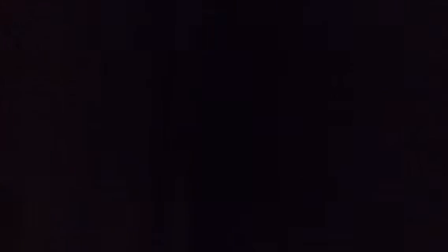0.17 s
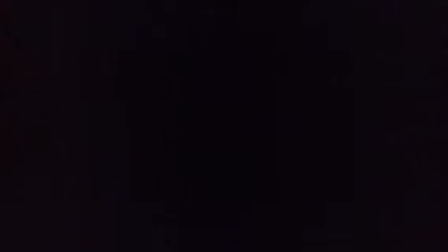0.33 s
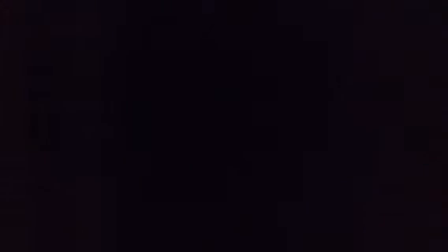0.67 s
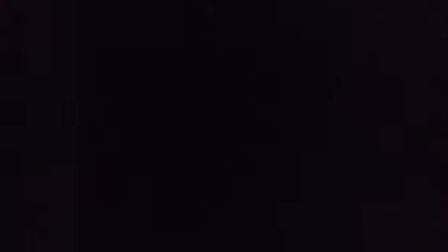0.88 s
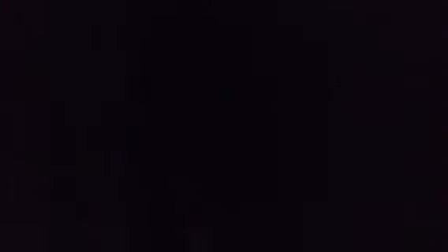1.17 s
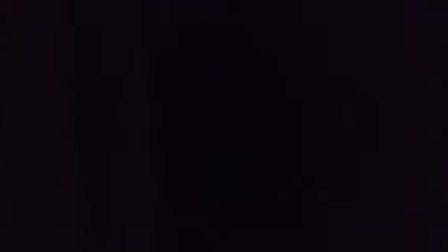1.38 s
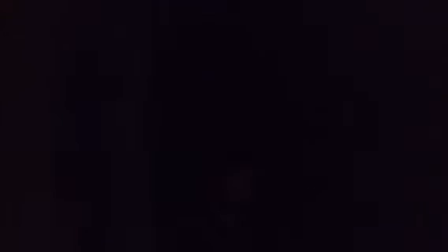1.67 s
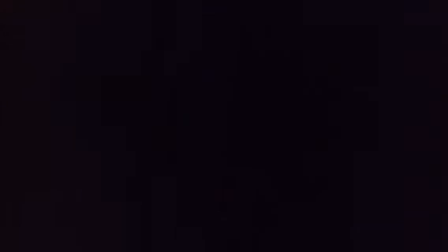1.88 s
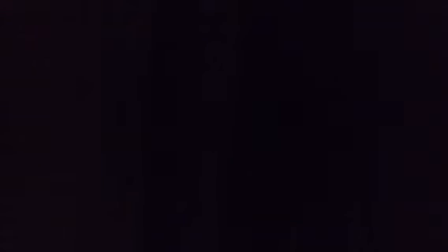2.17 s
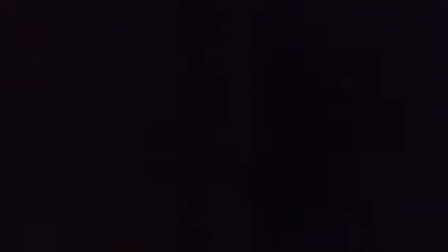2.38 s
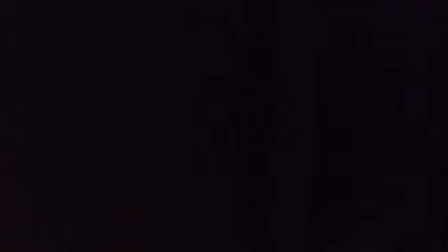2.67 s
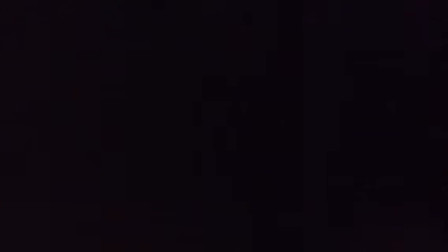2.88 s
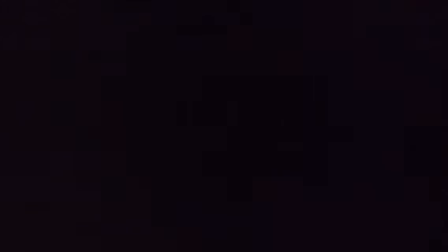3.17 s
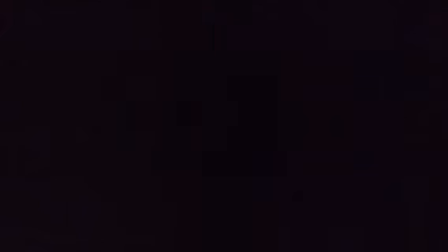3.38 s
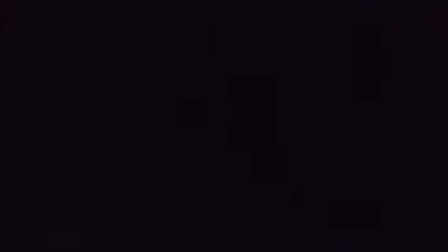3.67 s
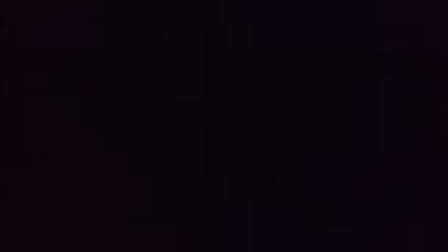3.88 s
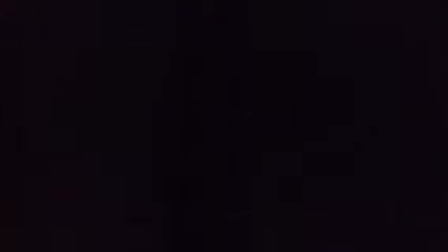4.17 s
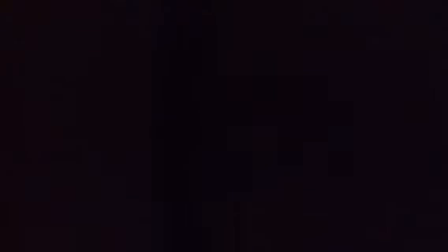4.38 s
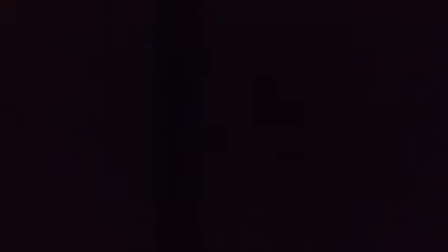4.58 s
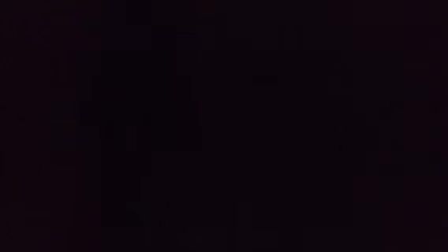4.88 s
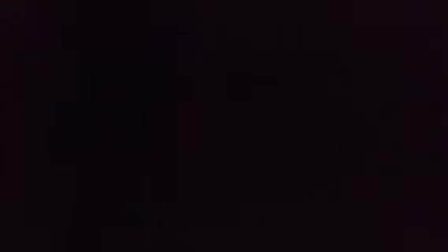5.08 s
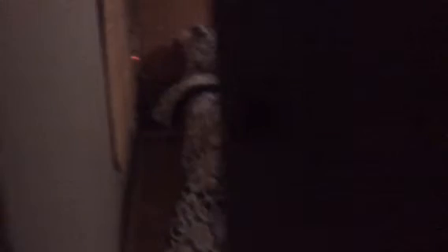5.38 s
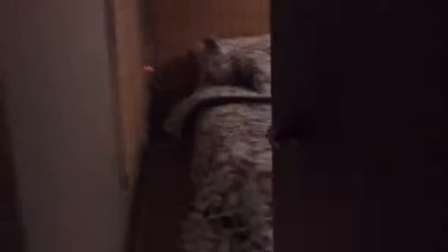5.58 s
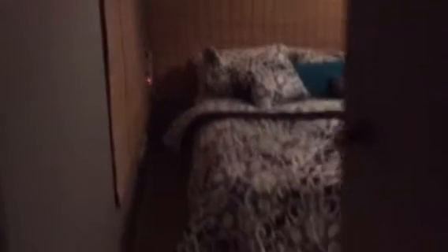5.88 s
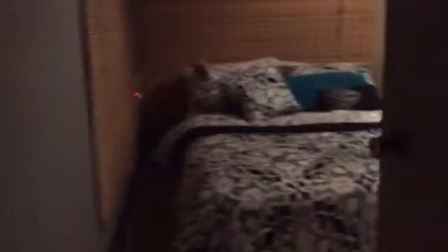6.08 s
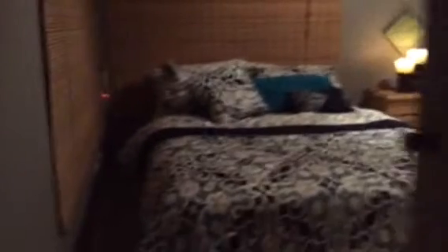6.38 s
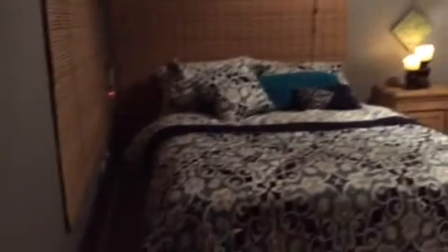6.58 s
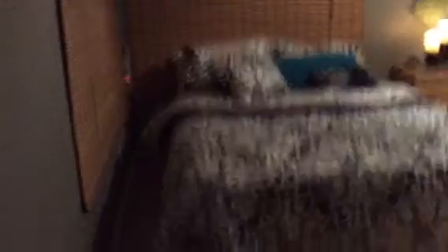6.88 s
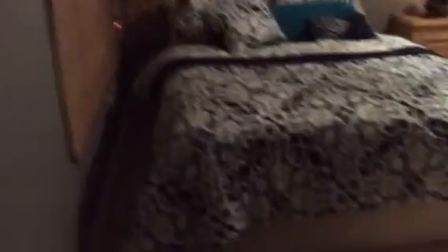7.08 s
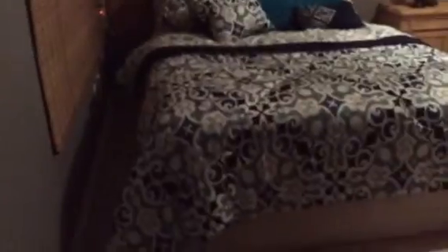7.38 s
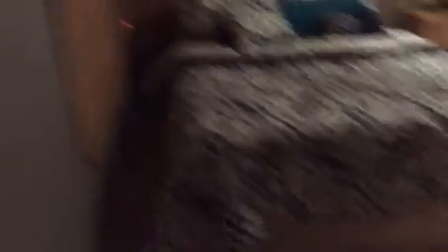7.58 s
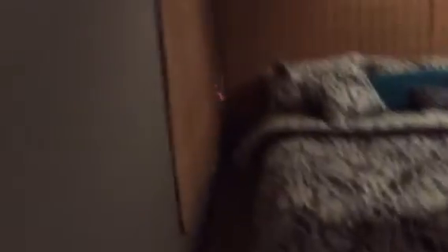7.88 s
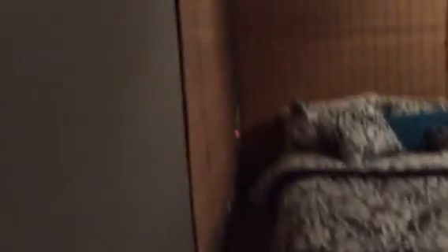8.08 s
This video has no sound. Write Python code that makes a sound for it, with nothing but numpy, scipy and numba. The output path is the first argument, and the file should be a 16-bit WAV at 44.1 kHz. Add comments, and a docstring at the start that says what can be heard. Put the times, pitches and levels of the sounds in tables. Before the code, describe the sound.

Throughout about 8 seconds, crickets trill near 7 kHz, swelling gently almost four times a second, with a fainter lower chorus, high rasp, soft hiss and weak wavering motor hum. The first two seconds hold only faint rustles and low handling thumps. At 2.4 to 2.7 s small knob clicks sound; from 3.0 to 3.3 s more metallic ticks and dull knocks. At 3.46 s the latch snaps in a tight cluster of sharp, ringing clicks, the loudest event. From 3.65 to 4.55 s the hinge squeals, falling fast from a thin whistle through a nasal squeak to a slow, gritty creak. Around 5.0 to 5.7 s come soft wooden thumps and faint rubs; at 6.2 s a dry tap on the microphone; near 7.05 and 7.5 s small bumps. The high rasp fades indoors. Close hand-held phone, short hallway tail, identical in both channels.

```python
"""Crickets trill outside over a motor hum and hiss: night in a thin-walled house, one hand-held phone microphone.
A hand works the knob and the latch snaps back, each click ringing the metal. The hinge, a train of stick-slip
pulses ringing plates and door leaf, squeals down from a whistle to a creak as the door slows. Steps and the hand
on the phone add low thumps, rustles and dry taps. Insects are gated noise, the hum is wavering sines."""
import sys
import numpy as np
from scipy import signal
from scipy.fft import rfft, irfft, next_fast_len
from scipy.io import wavfile
from scipy.ndimage import uniform_filter1d
from numba import njit

SR = 44100
rng = np.random.default_rng(int(sys.argv[2]) if len(sys.argv) > 2 else 0)


def wav_record(signal):
    """Record a signal, one row per channel, as 16-bit PCM in the file named by sys.argv[1]."""
    frames = np.transpose(np.atleast_2d(signal))
    bounded = np.clip(frames, -1, 1)
    # unit amplitude maps onto the largest positive 16-bit level
    quanta = np.round(bounded * 32767).astype(np.int16)
    wavfile.write(sys.argv[1], SR, quanta)


N = 363472


def undb(db):
    """dB to gain."""
    return 10 ** (np.asarray(db, float) / 20)


def unit(x):
    """Scale to rms 1."""
    return x / np.sqrt(np.mean(x ** 2))


def unit_energy(x):
    """Scale an impulse response so that its squares sum to 1."""
    return x / np.sqrt(np.sum(x ** 2))


def curves(table):
    """Columns of a table, after the time in seconds, as one value per sample."""
    s, *columns = np.transpose(table)
    return [np.interp(np.arange(N) / SR, s, c) for c in columns]


def band(x, hz, width_hz):
    """Resonance with gain 1 at its centre."""
    return signal.lfilter(*signal.iirpeak(hz, hz / width_hz, SR), x)


# the tilt brightens a ring fully up to the knee, and only by this share beyond
BRIGHT_KNEE_HZ, ABOVE_KNEE = 4400, 0.12


def ring(modes, tilt_db=0., pivot_hz=2000, size=6000, opposed=True):
    """Decaying modes struck at once, tilted in dB per octave around a pivot; peak 1.

    Neighbours swing in opposite sense, or in the same, which leaves notches between them."""
    hz, db, t60 = np.transpose(modes)[:, :, None]
    t = np.arange(size) / SR
    sense = (-1) ** (opposed * np.arange(len(modes))[:, None])
    octaves_past_knee = np.maximum(np.log2(hz / BRIGHT_KNEE_HZ), 0)
    octaves = np.log2(hz / pivot_hz) - (1 - ABOVE_KNEE) * octaves_past_knee
    fade = undb(db + tilt_db * octaves - 60 * t / np.maximum(t60, 1e-3))
    h = np.sum(sense * fade * np.sin(2 * np.pi * hz * t), axis=0)
    return h / np.abs(h).max()


def walk(rate):
    """Random levels held 1 / rate s and smoothed twice over as long; cut to N samples, then scaled to rms 1."""
    k = int(SR / rate)
    steps = np.repeat(rng.standard_normal(N // k + 1), k)
    return unit(uniform_filter1d(uniform_filter1d(steps, k), k)[:N])


def add(track, s, sound):
    """Mix a sound into a track at time s."""
    i = int(s * SR)
    track[i:i + len(sound)] += sound[:len(track) - i]


def stretch(s, length_s, edge_s):
    """1 from s for length_s, 0 elsewhere, with soft edges inside the stretch."""
    t = np.arange(N) / SR
    return np.clip(np.minimum(t - s, s + length_s - t) / edge_s, 0, 1)


# stepping through the doorway: middle moment and length
ENTER_S, ENTER_LENGTH_S = 6.25, 0.99


def inside():
    """0 in the hallway, 1 in the bedroom."""
    return np.clip((np.arange(N) / SR - ENTER_S) / ENTER_LENGTH_S + .5, 0, 1)


@njit
def slips(hz, rough, jitter, spread, chance):
    """A pulse at each wrap of the phase, shared between two samples; length and size vary from slip to slip."""
    out, p, k = np.zeros(len(hz) + 1), 0., 0
    for i in range(len(hz)):
        step = hz[i] * (1 + jitter * rough[i] * chance[k, 0]) / SR
        p += step
        if p >= 1:
            p, k = p - 1, k + 1
            size = np.exp(spread * rough[i] * chance[k, 1])
            out[i] += size * p / step
            out[i + 1] += size * (1 - p / step)
    return out[:-1]


# The squealing hinge. Each row: time in seconds, slips per second in Hz, drive level in dB before the mix,
# shove on the door leaf against the slips in dB.
HINGE = [(3.648, 1662, -55, -5), (3.68, 1525, -41.5, -2), (3.694, 1399, -42, -3), (3.697, 1368, -33, -22),
         (3.708, 1318, -34, -24), (3.73, 1273, -33.5, -20), (3.752, 1188, -30.5, -20),
         (3.76, 1007, -31, -18), (3.77, 1032, -31, -28), (3.794, 1006, -32, -12), (3.803, 984, -25.5, -14),
         (3.818, 919, -30, -9), (3.836, 906, -31, -4), (3.846, 870, -29.5, -5), (3.858, 857, -31.5, -6),
         (3.88, 832.6, -32, -4), (3.89, 794.6, -32, -8), (3.9, 775, -32, -8), (3.92, 753, -32, -5.5),
         (3.952, 697, -32.5, -5.5), (3.99, 633.7, -34, -2.5), (4.022, 572.5, -35, -2),
         (4.042, 550.6, -36, -4), (4.068, 507.4, -36, -2), (4.108, 452.6, -36.5, -11),
         (4.132, 423.8, -36, -5), (4.148, 408, -38.5, -10), (4.162, 383.7, -40, 0.5),
         (4.184, 355.7, -42, -13), (4.196, 342.7, -40, -1), (4.212, 333.8, -38.5, 0.5),
         (4.238, 315.6, -40, -16), (4.254, 297.2, -42, -2.5), (4.3, 239.7, -42.5, 1),
         (4.318, 229.2, -43, -16), (4.331, 219.7, -43, -2), (4.35, 205.4, -43, -10),
         (4.368, 193.6, -43.5, -4), (4.398, 168.3, -45, -16), (4.416, 156.5, -44.5, 2),
         (4.432, 145.7, -45.5, -11), (4.447, 135.3, -46, 0), (4.468, 124, -49, -17),
         (4.511, 118.9, -51.5, -1.5), (4.56, 100.4, -74, -5)]
# Hinge leaves and the door skin around them. Each row: mode in Hz, relative level in dB, t60 in seconds.
PLATE = [(906, -16, 0.032), (1204, 1, 0.016), (1720, -1, 0.044), (1853, -10.5, .03), (2028, 2, 0.032),
         (2305, -0.5, 0.028), (2567, -4, 0.024), (2845, -4.5, 0.021), (3230, -11, 0.022), (3440, -4, 0.024),
         (3686, -1, 0.026), (3926, -2.5, 0.029), (4070, -2.5, 0.026), (4230, -12.5, 0.028),
         (4615, -10, 0.034), (5140, -9.5, 0.027), (5440, -2, 0.016), (5970, -2.5, 0.0085),
         (7560, -15, 0.0041), (9600, -28, 0.0083)]
# The same plates held while the pin sticks long between slips, ringing short and broad.
# Each row: mode in Hz, relative level in dB, t60 in seconds.
HELD_PLATE = [(695, -15, 0.0084), (1090, -8, 0.016), (1410, -8, 0.02), (1714, 2, 0.019), (1894, -3, 0.024),
              (2540, 1, 0.0057), (3440, 2, 0.0041), (4140, 2.5, 0.0065), (5100, 5.5, 0.0038),
              (5860, 2.5, 0.0045), (8140, 4, 0.0013), (10800, -20, 0.0026)]
# Door leaf as the hinge drives it, with dead spots between its modes.
# Each row: mode in Hz, relative level in dB, t60 in seconds.
LEAF = [(120, -2, .09), (135, 3, 0.083), (157, 0, .09), (193, 3, .09), (222, 7.5, .09), (249, 10, .08),
        (275, 6, 0.062), (345, 6.5, .08), (388, 2, .09), (435, 3, 0.092), (506, 1.5, 0.079),
        (608, 4.5, 0.097), (644, -2, 0.079), (695, -3, 0.12), (745, -1.5, 0.098), (855, -3, 0.05),
        (860, 2.5, .07), (918, 2, .05), (990, 4, 0.066), (1090, -1, 0.068), (1205, -6, 0.065)]
# the pin catches at this moment; before it the slips are more uneven and their edge softer
CATCH_S, UNEVEN_BEFORE_CATCH, EDGE_BEFORE_CATCH_DB = 3.76, .2, -1.5
# slower slips are more uneven and grittier; values at 500 slips per second, change per octave slower
UNEVEN, UNEVEN_PER_OCTAVE = .21, .09
GRIT_DB, GRIT_DB_PER_OCTAVE = -9, 2.5
EDGE_DB = 2.15  # lift of the drive above 2800 Hz
SCRAPE_S = 0.0028  # decay constant of the grit that each slip drags along


def hinge():
    """Stick-slip on the pin: each slip drags grit, rings the plates and shoves the leaf."""
    hz, level_db, leaf_db = curves(HINGE)
    octaves_slower = np.log2(500 / hz)
    t = np.arange(N) / SR
    before_catch = t < CATCH_S
    rough = UNEVEN + UNEVEN_PER_OCTAVE * octaves_slower + UNEVEN_BEFORE_CATCH * before_catch
    moving = (t > HINGE[0][0]) & (t < HINGE[-1][0])
    # the slip rate flutters as the pin meets rough spots
    flutter = 1 + .0035 * walk(120)
    chance = rng.standard_normal((N // 20, 2))
    pulses = slips(hz * flutter * moving, np.clip(rough, 0, 1), 0.11, 0.14, chance)
    uneven_grip = undb(1.45 * walk(60))
    equal_power = np.sqrt(SR / hz)  # at any slip rate
    pulses = undb(level_db) * pulses * uneven_grip * equal_power
    keep = np.exp(-1 / (SCRAPE_S * SR))
    bursts = signal.lfilter([1 - keep], [1, -keep], pulses) * equal_power
    grit = undb(GRIT_DB + GRIT_DB_PER_OCTAVE * octaves_slower) * bursts * rng.standard_normal(N)
    # a harder release of the pin drives the upper modes more
    drive = pulses + grit
    soft = signal.sosfilt(signal.butter(2, 2800, fs=SR, output="sos"), drive)
    force = soft + undb(EDGE_DB + EDGE_BEFORE_CATCH_DB * before_catch) * (drive - soft)
    # share of the force's power that meets held plates
    sticking = np.clip(0.6 + 0.7 * octaves_slower, 0, .9)
    free = signal.fftconvolve(force * np.sqrt(1 - sticking), unit_energy(ring(PLATE)))[:N]
    held = signal.fftconvolve(force * np.sqrt(sticking), unit_energy(ring(HELD_PLATE)))[:N]
    snap = band(force, 2700, 3100)  # the slip itself, heard directly
    shove = undb(leaf_db + 1.9 * sticking * walk(40)) * pulses
    leaf = signal.fftconvolve(shove, unit_energy(ring(LEAF, opposed=False)))[:N]
    return undb(-2.0) * (free + held) + undb(-11.5) * snap + undb(1.5) * leaf


# Clicks of knob, latch and hand. Each row: start in seconds, peak in dB before the closing band-pass,
# brightness in dB per octave.
CLICKS = [(2.394, -26, 10), (2.4, -31, 12), (2.5923, -30, -10), (2.5982, -39, -7), (2.601, -41, -7),
          (2.719, -33, -12), (3.02, -40, -2), (3.03, -33, 2.5), (3.119, -25.5, 12.5), (3.124, -22.5, 8),
          (3.155, -26, 23), (3.205, -33, 15), (3.217, -24, 2), (3.227, -34, 2), (3.256, -36, -3),
          (3.293, -33, -2), (3.453, -23, 1), (3.4597, -20, 8), (3.4637, -6, -1.5), (3.4678, -5, -7.5),
          (3.4723, -13, 10), (3.4771, -7.5, -1.5), (3.4813, -14, 2), (3.491, -25, 6), (3.503, -29, 7),
          (3.521, -34, -3), (3.532, -36, -7), (5.037, -33.5, -2), (5.049, -39, -5), (5.141, -35, -7),
          (5.153, -42, -10), (5.171, -38, -7), (5.62, -39, 2)]
# Knob and latch. Each row: mode in Hz, relative level in dB before a random spread,
# t60 in seconds when no hand holds the knob.
METAL = [(1270, -22.5, .012), (1515, -8, 0.022), (1630, -3.5, 0.014), (1693, -1, 0.015),
         (1731, -1.5, 0.032), (1876, -9, 0.03), (2210, -14.5, 0.017), (2350, -19, 0.015),
         (2700, -17.5, 0.015), (3050, -14.5, 0.016), (3420, -18.5, .015), (3640, -13, .018),
         (4010, -6, 0.023), (4090, -8.5, 0.016), (4360, -10.5, 0.012), (4670, -17, 0.013),
         (4800, -16.5, 0.013), (5300, -14, 0.012), (5880, -14.5, 0.015), (6350, -19, 0.0074),
         (6800, -18, 0.0093), (7600, -40, .006), (9700, -27, .005)]
GRIP_DAMPING = .5  # share of the free ring time left while the hand holds the knob
RATTLE_S = 0.0054  # decay constant of the rattle


def clicks():
    """Each click is a tick and a short rattle of contacts; it rings the hardware and cracks broadly."""
    out, size = np.zeros(N), 1500
    damped = np.array(METAL) * [1, 1, GRIP_DAMPING]
    grits = rng.standard_normal((len(CLICKS), size + len(METAL)))
    for (s, peak_db, tilt_db), grit in zip(CLICKS, grits):
        blow = 0.12 * grit[:size] * np.exp(-np.arange(size) / SR / RATTLE_S)
        blow[0] = 1
        # every contact point excites the modes a little differently, here by 2.5 dB
        modes = damped + np.outer(2.5 * grit[size:], [0, 1, 0])
        sound = signal.fftconvolve(blow, ring(modes, tilt_db))
        crack = band(band(blow, 2000, 8100), 1600, 7900)
        add(sound, 0, undb(8.0 + 0.33 * tilt_db) * crack)
        add(out, s, undb(peak_db) * sound / np.abs(sound).max())
    return signal.sosfilt(signal.butter(2, [350, 9500], "band", fs=SR, output="sos"), out)


# Small dry ticks. Each row: start in seconds, peak in dB, centre in Hz, width in Hz.
TICKS = [(5.1295, -37, 1200, 1000), (5.13, -33, 5200, 3000), (5.1312, -37, 2600, 1500),
         (5.1375, -35, 2200, 3000), (6.1942, -35, 1700, 900), (6.367, -40, 3500, 4000),
         (6.6775, -32, 4400, 500), (6.678, -41, 1800, 900), (7.043, -39, 2300, 200),
         (7.053, -40, 2300, 200)]
TICK_S = .0008  # decay constant


def ticks():
    """A tiny burst, partly broad, mostly coloured by its own resonance."""
    out, t = np.zeros(N), np.arange(600) / SR
    for (s, peak_db, hz, width_hz), grit in zip(TICKS, rng.standard_normal((len(TICKS), 600))):
        burst = (1 + .5 * grit) * np.cos(2 * np.pi * hz * t) * np.exp(-t / TICK_S)
        broad = band(grit * np.abs(burst), 4000, 8300)
        sound = unit(band(burst, hz, width_hz)) + 0.33 * unit(broad)
        add(out, s, undb(peak_db) * sound / np.abs(sound).max())
    return out


# Low thumps of steps and hand. Each row: start in seconds, peak in dB, brightness in dB per octave.
THUMPS = [(0.881, -42, -7), (1.107, -33, -6.5), (2.157, -47, -7.5), (2.394, -42, 5), (2.595, -42.5, 2),
          (2.722, -48, -2.5), (3.056, -36, -10.5), (3.216, -29.5, 3), (3.242, -30, -10.5), (3.258, -31, -6),
          (3.317, -28, -10.5), (3.339, -41, -7), (3.464, -38, 4.5), (3.479, -39, 4.5), (3.49, -35, 5.5),
          (5.037, -28.5, -3.5), (5.056, -33.5, -2), (5.084, -31.5, -1), (5.278, -34.5, 1), (5.523, -40, -1),
          (5.707, -41, -9), (6.1888, -36, -2.5), (6.564, -44, 3), (7.043, -37.5, 5), (7.047, -33.5, 4.5),
          (7.084, -43, 4), (7.533, -35, -8)]
# Door leaf and floor. Each row: mode in Hz, relative level in dB, t60 in seconds.
WOOD = [(60.6, -5.5, 0.068), (123.5, 4, 0.053), (184, -4, 0.093), (237, 0.5, 0.069), (386, -1, 0.03),
        (570, -7, 0.093), (757, -0.5, 0.031), (1120, -19, .02)]
# push length at brightness 0, and the added brightness in dB per octave that halves it
PUSH_S, PUSH_HALVES_DB = 0.0024, 6.5


def thumps():
    """A soft push rings the wood; the shorter the push, the brighter."""
    out = np.zeros(N)
    for s, peak_db, tilt_db in THUMPS:
        push_s = PUSH_S * 2 ** (-tilt_db / PUSH_HALVES_DB)
        push = np.hanning(int(push_s * SR) + 4.0)
        sound = signal.fftconvolve(push, ring(WOOD, tilt_db, pivot_hz=240))
        add(out, s, undb(peak_db) * sound / np.abs(sound).max())
    return out


# Rustles, narrow rubs and a low buzz of cloth, fingers and wood.
# Each row: start in seconds, level in dB before the swell shapes it, length in seconds, centre in Hz, width in Hz.
RUSTLES = [(0., -52, 0.037, 704, 2000), (1.013, -47.5, 0.062, 11000, 12000), (1.056, -54, 0.11, 3450, 6000),
           (1.529, -48, 0.099, 700, 2490), (3.02, -50, 0.07, 1190, 3000), (3.141, -46.5, 0.026, 600, 1200),
           (3.2, -41, 0.08, 500, 1400), (4.697, -54, 0.13, 4000, 900), (4.93, -53.5, 0.098, 1810, 300),
           (5.035, -52, 0.035, 3600, 1500), (5.077, -56, .05, 3000, 302), (5.2, -56, 0.46, 4030, 700),
           (5.13, -49, 0.059, 1600, 900), (5.201, -60, 0.23, 1830, 150), (5.321, -55.5, 0.33, 1820, 130),
           (5.087, -43.5, 0.057, 138, 25), (7.042, -44.5, 0.031, 260, 50), (7.043, -59, 0.027, 800, 150),
           (7.071, -48, 0.064, 240, 60), (5.126, -57, 0.035, 2960, 6960), (7.034, -54, 0.024, 3000, 4470)]


def rustles():
    """Short grainy swells of noise, each through its own broad or narrow resonance."""
    out = np.zeros(N)
    grits = rng.standard_normal((len(RUSTLES), 2, SR // 2))
    for (s, level_db, length_s, hz, width_hz), grit in zip(RUSTLES, grits):
        n = int(length_s * SR)
        graininess_db = 0.62 * unit(uniform_filter1d(grit[1, :n], size=200))
        grains = grit[0, :n] * undb(graininess_db)
        add(out, s, undb(level_db) * np.hanning(n) ** .5 * unit(band(grains, hz, width_hz)))
    return out


# A finger on the phone body, right at the microphone. Each row: start in seconds, peak in dB, length in seconds.
TAPS = [(2.7205, -30, 0.0066), (5.678, -34, 0.0056), (5.7025, -33, 0.0033), (6.1895, -36, 0.0042),
        (6.1927, -20.5, 0.0029), (6.198, -35, 0.0038), (6.2078, -33, 0.0033)]


def taps():
    """A dry pull-and-push of air: one swing down and a larger swing up, without ring."""
    out = np.zeros(N)
    for s, peak_db, length_s in TAPS:
        u = np.arange(int(length_s * SR)) / (length_s * SR)
        swing = -np.sin(2 * np.pi * u ** 0.71) * np.sin(np.pi * u) * (0.69 + u)
        add(out, s, undb(peak_db) * swing / swing.max())
    return out


def singer(hz, width_hz, stroke_hz, depth, sharp):
    """One insect: wing strokes at a wavering rate gate a noisy resonance."""
    phase = np.cumsum(stroke_hz * (1 + 0.042 * walk(2.8))) / SR + rng.random()
    gate = 1 - depth + depth * np.abs(np.sin(np.pi * phase)) ** (2 * sharp)
    return unit(band(band(gate * rng.standard_normal(N), hz, width_hz), hz, width_hz))


# The night as heard where the phone is. Each row: time in seconds, near crickets in dB before their swells,
# far chorus in dB, top rasp in dB, hiss in dB before its waver (played by room).
NIGHT = [(0., -53.5, -57, -56, -61), (.8, -52.5, -59, -58.5, -63), (1.19, -56.5, -51.5, -58, -58),
         (1.3, -51, -53, -61, -55.5), (1.6, -47.5, -55, -64, -53.5), (2.3, -46.5, -57, -62, -53),
         (3.0, -47.5, -57.5, -62, -51.5), (3.35, -46.5, -54, -58, -45.5), (3.6, -47.5, -57.5, -64, -54),
         (4.6, -46.5, -56, -66, -50), (5.5, -47, -58.5, -73, -53), (6.3, -48.5, -64.5, -82, -54),
         (6.9, -48.5, -63, -71, -56.5), (7.3, -49, -60.5, -70.5, -56), (8.24, -51.5, -62.5, -69, -60)]
# near crickets swell in chorus; the depth is a share of the amplitude
CHIRP_HZ, FIRST_CHIRP_S, CHIRP_DEPTH = 3.875, 0.045, 0.26
# two groups drift in and out of step: the depth varies by this much, and is shallowest once per period
CHIRP_BEAT, BEAT_PERIOD_S, SHALLOW_S = 0.098, 2.14, 1.53
# rasp at 9 to 10 kHz: level in the hallway, change in the bedroom
RASP_DB, RASP_INSIDE_DB = -62.5, -8


def insects():
    """Near crickets overlap around 7 kHz; a far chorus sits near 3 kHz; bush crickets rasp at the top."""
    near_db, low_db, high_db, _ = curves(NIGHT)
    t = np.arange(N) / SR
    depth = CHIRP_DEPTH - CHIRP_BEAT * np.cos(2 * np.pi * (t - SHALLOW_S) / BEAT_PERIOD_S)
    chirps = 1 + depth * np.cos(2 * np.pi * CHIRP_HZ * (t - FIRST_CHIRP_S))
    near = singer(6927, 230, 46, 0.23, 0.4) + singer(7175, 276, 66, 0.21, 0.62)
    near = near + 0.29 * singer(6880, 470, 60, 1.0, 1.9)
    low = singer(3055, 344, 40, 0.19, 0.72) + 0.57 * singer(2651, 240, 36, 0.19, 0.87)
    mid = singer(9380, 920, 31, 0.12, 1.1) + 0.65 * singer(10100, 250, 61, 0.33, 1.2)
    # the top rasp changes singer when the door has opened
    opened = np.clip((t - 6.3) / 0.63, 0, 1)
    slow = singer(14300, 3500, 13.4, .45, 1.4) * undb(1.5 * walk(8))
    high = (1 - opened) * singer(14400, 3200, 30.7, 0.23, 0.66) + opened * slow
    near = unit(near) * chirps * undb(near_db + 1.46 * walk(12))
    mid = unit(mid) * undb(RASP_DB + RASP_INSIDE_DB * inside())
    return near + unit(low) * undb(low_db) + mid + high * undb(high_db)


# Colour of the room hiss. Each row: frequency in Hz, relative level in dB per Hz.
HISS = [(30, 4), (60, -2.5), (140, 2), (500, -9.5), (1300, -10), (1950, -4), (2400, -17), (3650, -9),
        (4100, -3), (4600, -8.5), (6100, -9), (7500, -5.5), (8200, -66), (15300, -54)]
# Hand rubbing the hardware. Each row: start in seconds, length in seconds, level at its middle in dB.
RUBS = [(1.017, 0.3, -59), (2.98, 1, -57.5), (4.45, 0.15, -65), (5.0, 0.26, -73)]
# Low rustle. Each row: time in seconds, level in dB.
RUSTLE = [(0., -53), (.25, -60.5), (1.6, -57), (1.9, -74.5), (2.9, -68), (3.2, -50), (3.45, -62),
          (4.5, -53), (4.8, -61.5), (5.15, -54.5), (5.8, -56), (8.24, -55)]
# steady rub: level in the hallway, change in the bedroom
RUB_DB, RUB_INSIDE_DB = -71, 8.5


def room():
    """Coloured hiss, noise rubbed into the hardware and a grainy low rustle."""
    hiss_db = curves(NIGHT)[-1]
    rubbing = undb(RUB_DB + RUB_INSIDE_DB * inside())
    for s, length_s, db in RUBS:
        rubbing = rubbing + undb(db) * stretch(s, length_s, length_s / 2)
    size = next_fast_len(N)
    hz = np.maximum(np.fft.rfftfreq(size, 1 / SR), 1)
    colour_hz, colour_db = np.transpose(HISS)
    colour = undb(np.interp(np.log(hz), np.log(colour_hz), colour_db))
    hiss = unit(irfft(colour * rfft(rng.standard_normal(size)), size)[:N]) * undb(hiss_db)
    hiss = hiss * undb(.7 * walk(9))
    rub = unit(signal.fftconvolve(rng.standard_normal(N) * undb(2.4 * walk(30)), ring(PLATE))[:N])
    rustle = unit(band(rng.standard_normal(N) * undb(1.7 * walk(40)), 245, 430))
    return hiss + rub * rubbing + rustle * undb(curves(RUSTLE)[0])


# Motor lines. Each row: frequency in Hz, wander in Hz, waver in dB.
HUM_LINES = [(59, 3.5, 2), (118, 4, 4), (173, .8, 1.2), (236, 1.5, 1.5), (883, 1.2, 1.5)]
# Level of each motor line, in the same order. Each entry: rms level in dB before waver and swells.
HUM_DB = [-64, -66.5, -69.5, -69, -70]
# Stretches where a line is louder or fainter. Each row: line in Hz, start in seconds, length in seconds,
# change in dB.
HUM_SWELLS = [(59, 2.52, .95, 4), (59, 6.2, .55, -15), (59, 7.2, 0.6, -0.5), (118, 4.95, 0.43, 10.5),
              (173, 7.05, 1.5, 11), (236, 4.75, 0.25, 16), (883, 5.5, 1.33, -18)]
SWELL_EDGE_S = 0.053


def hum():
    """Motor lines whose pitch and level waver."""
    out = 0
    for (hz, wander_hz, waver_db), level_db in zip(HUM_LINES, HUM_DB):
        for line_hz, s, length_s, change_db in HUM_SWELLS:
            if abs(line_hz - hz) < .1 * hz:  # the swell belongs to this line
                level_db = level_db + change_db * stretch(s, length_s, SWELL_EDGE_S)
        phase = 2 * np.pi * np.cumsum(hz + wander_hz * walk(14)) / SR
        out = out + np.sqrt(2) * undb(level_db + waver_db * walk(14)) * np.sin(phase)
    return out


ROOM_T60_S, ROOM_DB = .16, -15  # hallway tail


def scene():
    """Door sounds get a short tail from the hallway; one microphone feeds both channels."""
    door = hinge() + clicks() + ticks() + thumps() + rustles()
    t = np.arange(int(.4 * SR)) / SR
    tail = rng.standard_normal(len(t)) * undb(-60 * t / ROOM_T60_S) * (t > .004)
    wet = signal.fftconvolve(door, unit_energy(tail))[:N]
    return np.tile(door + undb(ROOM_DB) * wet + taps() + insects() + room() + hum(), (2, 1))


def record(dry):
    """The phone cuts the deep bass below 45 Hz and the top above 15350 Hz."""
    x = signal.sosfilt(signal.butter(4, 45, "high", fs=SR, output="sos"), dry)
    return signal.sosfilt(signal.ellip(10, .2, 80, 15350, fs=SR, output="sos"), x)


dry = scene()
out = record(dry)
wav_record(out)
```